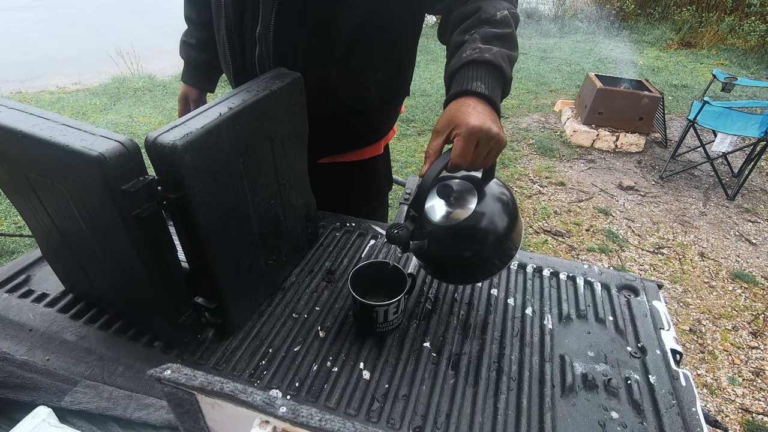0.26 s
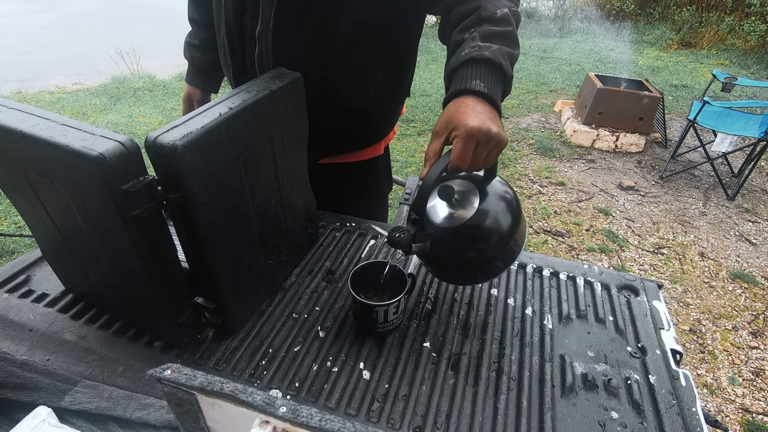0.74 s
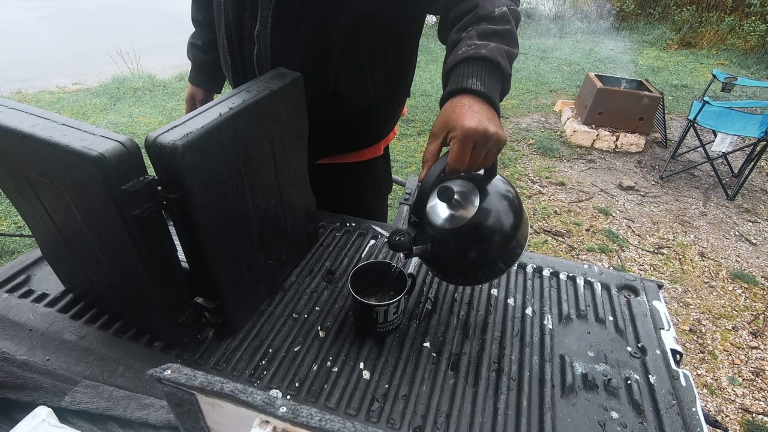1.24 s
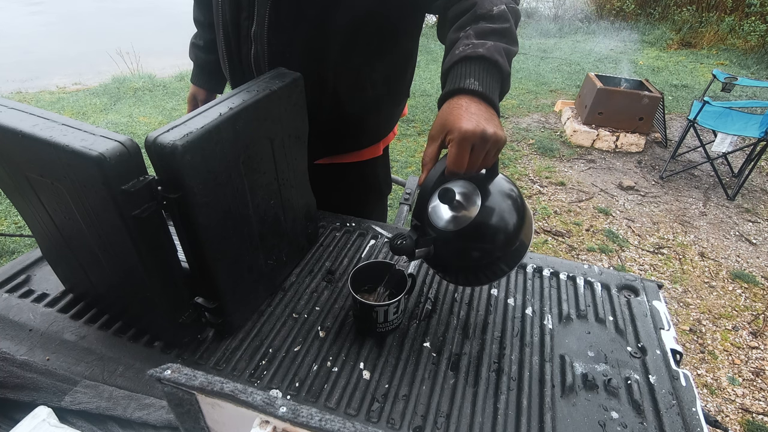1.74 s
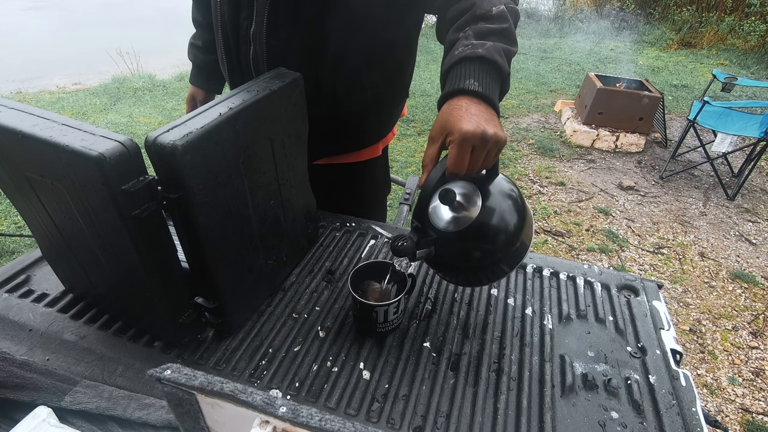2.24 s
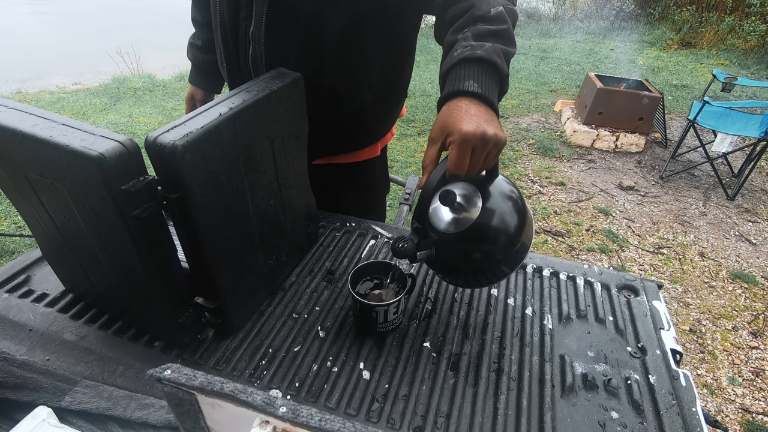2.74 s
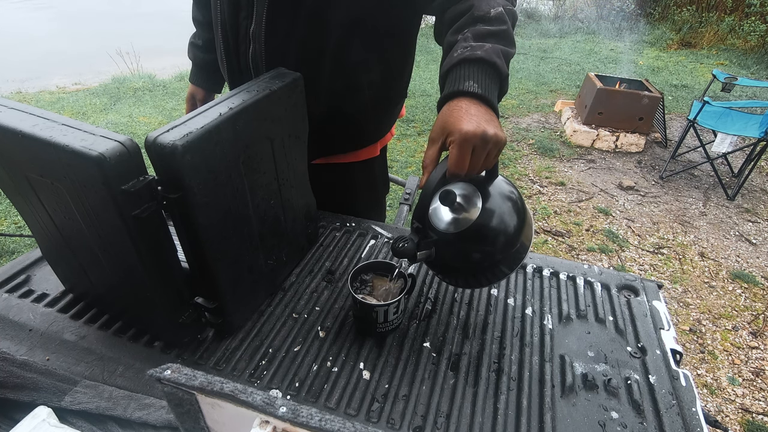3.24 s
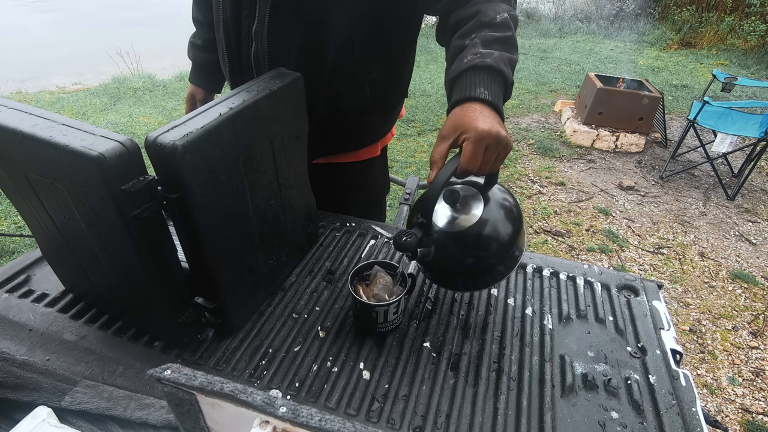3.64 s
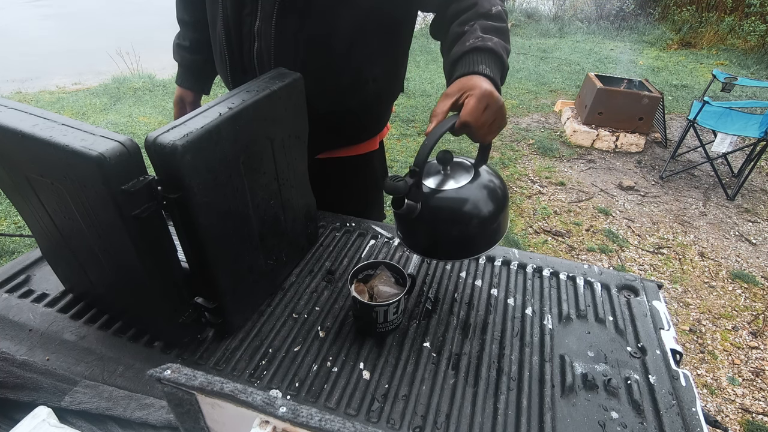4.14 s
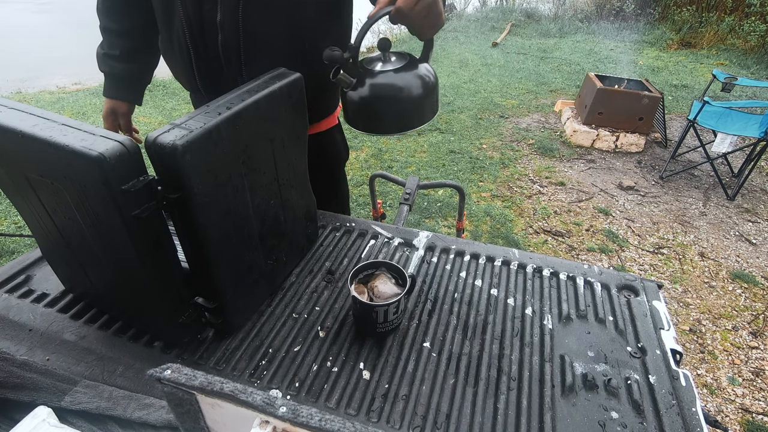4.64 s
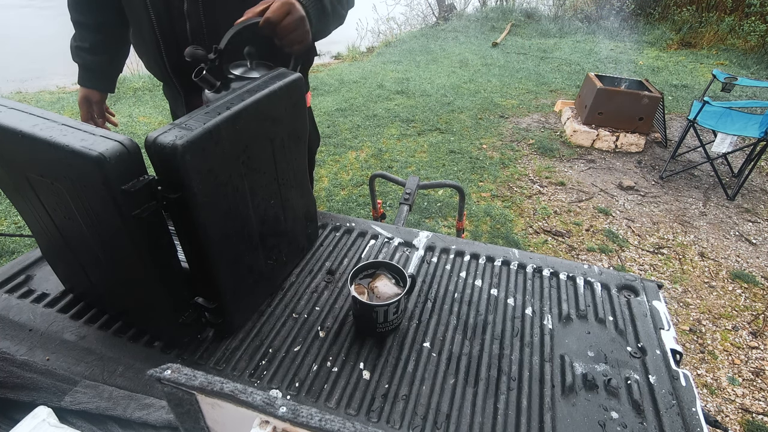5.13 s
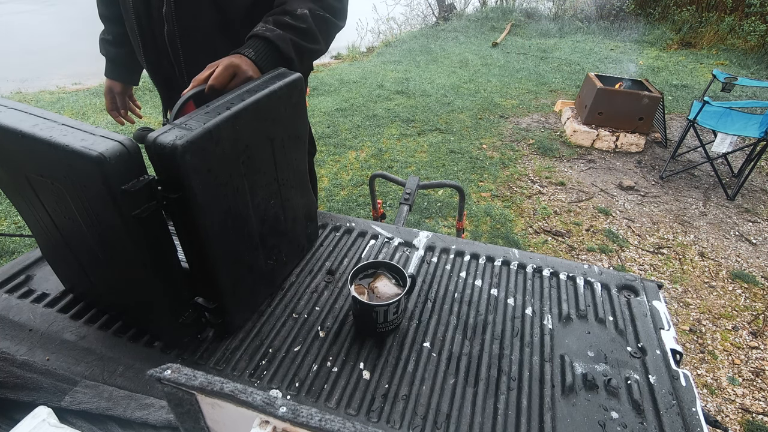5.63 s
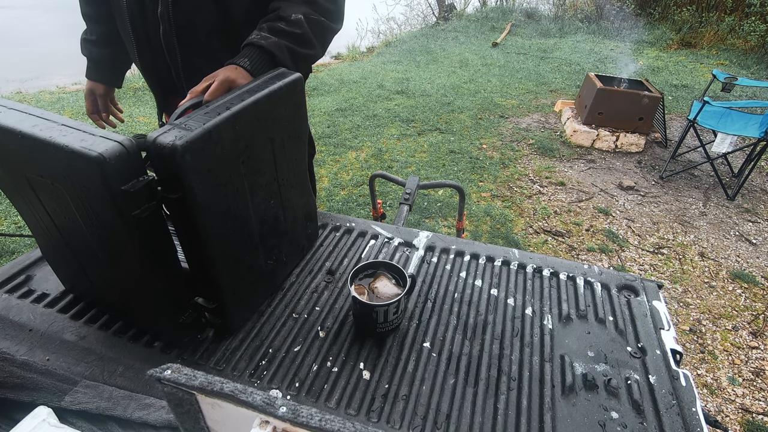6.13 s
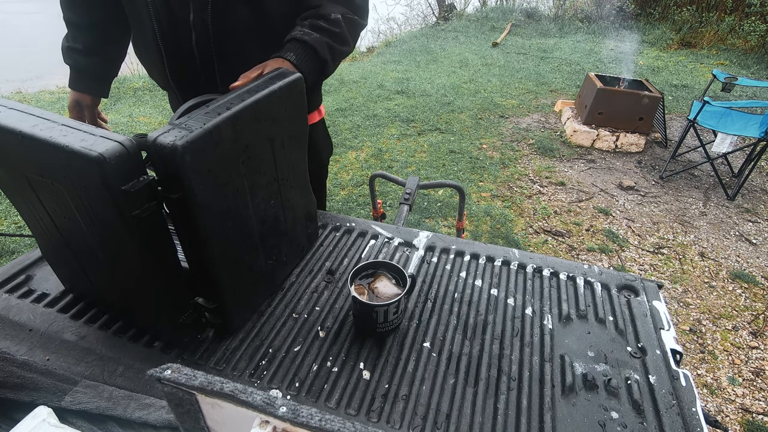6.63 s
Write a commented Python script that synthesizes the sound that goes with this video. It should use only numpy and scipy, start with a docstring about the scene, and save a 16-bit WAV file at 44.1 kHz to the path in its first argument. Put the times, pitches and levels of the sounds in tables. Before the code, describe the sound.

An uneven trickle ticks and bubbles into a metal cup for almost four seconds, its middle darker and gluggy with soft mug thumps. A small metallic bump follows as pouring stops, and a high bird trills through tree echoes. After a near-quiet gap with grassy scuffing, several dull, hollow panel thuds and clanks come close together. Open air, near microphone, faint distant hum.

```python
"""Pouring water into a metal mug outdoors

Water is poured in an uneven trickle from a kettle into a metal mug on a truck's ribbed tailgate: rising bubble
blips tick and plop, some with a thump of mug resonances. The tailgate is bumped, the kettle and a case lid knock
on it: noise-driven decaying modes plus rattle. A sleeve and steps in the grass rustle as grainy band noise.
Songbirds whistle and trill as glides smeared by tree echoes, over a low distant hum of flickering noise bands."""
import sys
import numpy as np
from scipy import signal
from scipy.fft import rfft, irfft
from scipy.io import wavfile
from scipy.ndimage import uniform_filter1d

SR = 44100
rng = np.random.default_rng(int(sys.argv[2]) if len(sys.argv) > 2 else 0)


def to_wav(s):
    """Save 16-bit WAV."""
    ch = np.atleast_2d(s).T  # columns
    pcm = np.round(np.clip(ch, -1, 1) * 32767)  # PCM
    wavfile.write(sys.argv[1], SR, pcm.astype(np.int16))


N = 303408
t = np.arange(N) / SR
hz_axis = np.maximum(np.fft.rfftfreq(N, 1 / SR), 1)


def undb(db):
    """Amplitude gain of a dB level."""
    return 10 ** (np.asarray(db) / 20)


def unit(x):
    """Scale to RMS 1."""
    return x / np.sqrt(np.mean(x ** 2))


def along(table):
    """Read a (Hz, value) table at every frequency, linear in log Hz."""
    hz, value = np.transpose(table)
    return np.interp(np.log(hz_axis), np.log(np.maximum(hz, 1)), value)


def curve(s, db):
    """Gain along a dB curve, -200 dB outside it."""
    return undb(np.interp(t, s, db, -200, -200))


def band(x, hz, width_hz):
    """Two-pole resonance, gain 1 at the centre."""
    return signal.lfilter(*signal.iirpeak(min(hz, .45 * SR), hz / width_hz, SR), x)


def add(out, s, x):
    """Mix x into out from time s."""
    i = int(s * SR)
    out[i:i + len(x)] += x[:len(out) - i]


def fade(t60_s):
    """Exponential decay envelope."""
    return np.exp(-np.log(1000) * t[:int(t60_s * SR)] / t60_s)


def walk(rate_hz):
    """Random steps at rate_hz, smoothed twice by a one-step moving average."""
    k = int(SR / rate_hz)
    steps = np.repeat(rng.standard_normal(N // k + 1), k)
    return 0.93 * uniform_filter1d(uniform_filter1d(steps, k), k)[:N]


# Hum and air spectrum: (frequency [Hz], relative level [dB per Hz])
FIELD_HZ_DB = [(25, -6.5), (91, -18), (167, 0), (510, -16), (579, -5), (785, -2), (1950, -18), (2930, -20),
               (4290, -18.5), (10700, -34), (13900, -100)]
# Left-right likeness: (frequency [Hz], correlation [-1..1])
FIELD_ALIKE = [(300, .97), (600, -.7), (1300, -.6), (3000, .5), (9000, 0.)]
FIELD_MID_DB = -68.5


def field():
    """Far hum and air: half-octave-spaced noise bands, each flickering alone."""
    mid, side = 0, 0
    alike = np.clip(along(FIELD_ALIKE), -1, 1)
    for hz in 30 * 2 ** np.arange(0, 9, .5):
        shape = np.exp(-(np.log2(hz_axis / hz) / 0.5) ** 2) * undb(along(FIELD_HZ_DB))
        band_mid = irfft(rfft(rng.standard_normal(N)) * shape * np.sqrt(1 + alike), N)
        band_side = irfft(rfft(rng.standard_normal(N)) * shape * np.sqrt(1 - alike), N)
        gain = undb(1.2 * walk(3.41))
        mid, side = mid + gain * band_mid, side + gain * band_side
    scale = undb(FIELD_MID_DB) / np.sqrt(np.mean(mid ** 2))
    return mid * scale, side * scale


def note(shape, hz):
    """A near-sine glide that turns near a given pitch and warbles slightly."""
    length_s, turn, start, end = shape
    u = np.linspace(0, 1, int(length_s * SR))
    glide = np.interp(u, [0, turn, 1], [start, 1, end])
    hz = hz * uniform_filter1d(glide, size=len(u) // 5, mode="nearest")
    hz *= 1 + .016 * np.repeat(rng.standard_normal(len(u) // 150 + 1), 150)[:len(u)]
    return np.sin(2 * np.pi * np.cumsum(hz) / SR) * np.sqrt(np.abs(np.sin(np.pi * u)))


# Whistled notes: (time [s], shape name, turning pitch [Hz], level before echoes [dB])
WHISTLE = [(0.049, "fall", 2810, -78.5), (0.135, "hold", 3430, -73), (.312, "slide", 2314, -74),
           (.42, "fall", 2163, -76.5), (3.05, "arch", 6420, -66.5), (3.148, "dip", 7400, -67),
           (3.324, "slide", 3960, -77), (3.385, "arch", 6350, -66.5), (3.422, "fall", 2660, -78),
           (3.474, "dip", 7220, -67.5), (3.496, "hold", 3038, -76), (3.597, "dip", 8370, -73),
           (3.683, "arch", 6430, -61.5), (5.505, "fall", 2823, -78), (5.789, "slide", 2730, -79.5),
           (6.432, "arch", 4860, -69.5), (6.519, "drop", 3130, -77.5), (6.559, "fall", 2430, -76.5),
           (6.612, "arch", 3240, -73)]
# Note shapes by name: (length [s], share before the turn, start / turning pitch, end / turning pitch)
NOTE_SHAPE = dict(arch=(.045, .45, .68, .88), dip=(0.0494, 0.36, 1.3, 1.07), slide=(0.04, 0.6, 1.08, 0.8),
              fall=(.075, 0.32, 1.6, .97), drop=(0.021, 0.51, 1.8, 0.45), hold=(.165, .33, .81, .995))
# Falling sweep of the trill: (length [s], share before the turn, start / turning pitch, end / turning pitch)
TRILL_SWEEP = (.038, .45, 1.33, .555)
TRILL_S, TRILL_PERIOD_S, TRILL_HZ, TRILL_DB = 3.777, .0838, 7030, -63.5


def birds():
    """Distant song, smeared by echoes off the trees, unlike at the two ports; high voices sit nearer."""
    far, near = np.zeros(N), np.zeros(N)
    for s, shape, hz, db in WHISTLE:
        add(near if hz > 4500 else far, s, undb(db) * note(NOTE_SHAPE[shape], hz))
    for k in range(15):
        add(near, TRILL_S + k * TRILL_PERIOD_S, undb(TRILL_DB) * note(TRILL_SWEEP, TRILL_HZ))
    out = np.zeros((2, N))
    for song, dry_gain, wet_gain, t60_s in ((far, .35, 1.1, .5), (near, .15, .3, .45)):
        env = fade(t60_s)
        flutter = np.exp(-t[:len(env)] / 0.011)
        trees = rng.standard_normal((3, len(env))) * (wet_gain * env + flutter) * undb(-24.0)
        trees = trees[:1] + trees[1:]  # one shared part, one per port
        leaves = undb(4 * walk(400))  # moving foliage blurs the echoes
        out += leaves * dry_gain * song
        out += leaves * signal.fftconvolve(song[None], trees, axes=1)[:, :N]
    return out


def bubble(hz, cycles, click):
    """A short rising blip with its octave, and a broad tick and spray around it."""
    s = t[:1200]
    phase = 2 * np.pi * hz * s * (1 + 0.09 * hz * s / cycles)
    tone = np.sin(phase) + hz / 20000 * np.sin(2 * phase)
    tone = tone * np.exp(-np.log(1000) * s * hz / cycles) * (1 - np.exp(-hz * s))
    spray = np.exp(-s / 0.0012) + 0.3 * np.exp(-s / 0.011)
    return 2 * tone + click * band(rng.standard_normal(1200), 1.84 * hz, 11000) * spray


# Sleeve and steps in the grass: (time [s], level [dB])
RUSTLE_S_DB = [(4.85, -76), (5.0, -67), (5.15, -62), (5.25, -70.5), (5.5, -91)]
# Dull ticks: (time [s], level [dB])
SCUFF_S_DB = [(4.9432, -48), (5.183, -48.5)]


def rustle():
    """Soft scuffing: band noise with a grainy random level, and a few dull ticks."""
    cloth = rng.standard_normal(N)
    grain = undb(7.7 * walk(40))
    out = curve(*np.transpose(RUSTLE_S_DB)) * grain * unit(band(cloth, 1020, 2200) + band(cloth, 2230, 410))
    for s, db in SCUFF_S_DB:
        add(out, s, undb(db) * bubble(1370, 9.7, 0.15))
    return out


def ring(modes, rise_s, contact_s, loose):
    """A blow on modes: rough contact drives them unevenly, heavy parts swell in, loose parts wander in pitch."""
    s = t[:SR // 2]
    chance = rng.standard_normal((len(modes), 16))
    out = 0
    for (hz, db, t60_s), c in zip(modes, chance):
        wander_s = np.cumsum(1 + loose * np.interp(s, np.linspace(0, .5, 15), c[1:])) / SR
        decay = np.exp(-np.log(1000) * s / t60_s)
        out = out + undb(db + c[0]) * np.sin(2 * np.pi * hz * wander_s) * decay
    contact = rng.standard_normal(SR // 8) * np.exp(-t[:SR // 8] / max(contact_s, 1e-4))
    out = signal.fftconvolve(out * (1 - np.exp(-s / max(rise_s, 1e-4))), contact)
    return out / np.max(np.abs(out))


# Knocks: (time [s], panel level [dB]; then, relative to the panel: sway [dB], ribs [dB],
# hardness as crack [dB], steel [dB]; grinding contact [s])
KNOCK = [(3.602, -52, 0.5, -31, -44, -21, 0.017), (3.971, -34.5, -15, 2, -10.5, -2, 0.023),
         (5.917, -46, -37, 6, 3, -3.5, 0.16), (5.974, -37.5, -35, 6.5, -6.5, -16, 0.011),
         (6.035, -30, -10, -5, -10, -17.5, 0.0057), (6.051, -34.5, -8, 5.5, -0.5, 3.5, 0.019),
         (6.255, -21.5, -12.5, -9, -14, -19.5, 0.032), (6.565, -40, -8.5, -2, -21, -50, 0.052),
         (6.648, -25, -4.5, 0, -10, -28, 0.028), (6.743, -34, -1, -1, -24.5, -31, 0.025)]
# Tailgate modes, heavy to light, then thin steel: (frequency [Hz], level [dB], t60 [s])
SWAY_MODES = [(77.9, -3.5, 0.37), (108.7, -1, 0.38)]
PANEL_MODES = [(177.7, 0, 0.3)]
RIB_MODES = [(261.4, 0, 0.24), (358.5, -12, 0.21)]
SHELL_MODES = [(415, 1, 0.068), (510, -3.5, 0.064), (650, -2.5, 0.027), (825, -1, 0.033), (953, -8, 0.058),
               (1165, -11, 0.045), (1416, -9.5, 0.047), (1839, -15.5, 0.063)]
STEEL_MODES = [(729, 10.5, 0.23), (1660, -5.5, 0.37), (1830, -15.5, 0.5), (2816, 5, 0.1), (3890, 2, 0.099),
               (4224, -4, 0.14)]
# Crack spectrum: (frequency [Hz], relative level [dB per Hz])
CRACK_HZ_DB = [(150, -5), (700, 6.5), (1200, -0.5), (2100, -7), (4600, -17), (9000, -43)]
SHELL_DB = 9.5  # over the crack: a harder blow rings the light shell more


def knocks():
    """Each knock rings the tailgate's parts and rattles noisily while it grinds; the heavy parts lag."""
    out, rattle, sizzle = np.zeros((3, N))
    s_half = t[:SR // 2]
    for s, db, sway_db, rib_db, hard_db, steel_db, grind_s in KNOCK:
        sway = undb(db + sway_db) * ring(SWAY_MODES, 0.025, .02, .12)
        panel = undb(db) * ring(PANEL_MODES, 0.0042, 0, .06)
        add(out, s, sway + panel)
        add(out, s, undb(db + rib_db) * ring(RIB_MODES, 0.0063, 0, .04))
        add(out, s, undb(db + hard_db + SHELL_DB) * ring(SHELL_MODES, 0.00051, grind_s, 0.039))
        add(out, s, undb(db + steel_db) * ring(STEEL_MODES, 0, grind_s / 20, .004))
        add(rattle, s, undb(db + hard_db) * np.exp(-s_half / (0.0036 + grind_s)))
        add(sizzle, s, undb(db + steel_db) * s_half / grind_s * np.exp(-s_half / (0.39 * grind_s)))
    grit = unit(irfft(rfft(rng.standard_normal(N)) * undb(along(CRACK_HZ_DB)), N))
    hiss = undb(3.5) * unit(band(rng.standard_normal(N), 6900, 3800))  # loose steel chatters just after
    return out + (rattle * grit + sizzle * hiss) * undb(0.49 * walk(90))


def glug():
    """A low tone under a plop with a falling, unsteady pitch, each one its own size."""
    env, size = fade(0.13), 2 ** (0.64 * (rng.random() - .5))
    fall_hz = 230 + 1100 * np.exp(-t[:len(env)] / 0.00713)
    hz = size * fall_hz * (1 + 3.0 * band(rng.standard_normal(len(env)), 144, 380))
    return np.sin(2 * np.pi * np.cumsum(hz) / SR) * env


def splash(db, hz):
    """One main bubble, 10 ms in, and four weaker ones around it."""
    out = np.zeros(SR // 12)
    add(out, 1 / 100, undb(db) * bubble(hz, 24, 0.45))
    for u, v, e in rng.random((4, 3)):
        small = bubble(hz * 2 ** (0.3 * v - .12), 24, 0.35)
        add(out, .006 + .03 * u, undb(db - 9 - 8 * e) * small)
    return out


# Starting pitch of splashes and drops: (time [s], pitch [Hz])
RING_S_HZ = [(.375, 3300), (.4, 1896), (.66, 1800), (.76, 4080), (1.235, 4500), (1.28, 2890), (1.69, 4090),
             (1.96, 2750), (2.8, 3570), (3.7, 3840)]


def ring_hz(s):
    """Splash and drop pitch at time s."""
    return np.interp(s, *np.transpose(RING_S_HZ))


# Splashes: (time [s], level [dB])
SPLASH_S_DB = [(0.298, -49), (0.373, -45.5), (0.4018, -50.5), (0.6562, -44), (0.767, -46), (.7884, -48),
               (.93, -46), (0.946, -43.5), (0.967, -35), (1.0167, -40.5), (1.1102, -57), (1.2344, -42.5),
               (1.2801, -45), (1.3529, -39), (1.3746, -47), (1.4253, -42), (1.639, -54), (1.6873, -39),
               (1.968, -38), (2.845, -50), (2.964, -47), (3.003, -47), (3.065, -55), (3.092, -49),
               (3.107, -45.5), (3.1543, -46.5), (3.241, -45), (3.251, -42), (3.266, -50), (3.3203, -38),
               (3.3305, -40.5), (3.5105, -40), (3.712, -46)]
# Low plops, some with a mug thump: (time [s], plop level [dB], thump level [dB])
PLOP_S_DB = [(1.189, -53, -55.5), (1.56, -52, -55), (1.688, -49.5, -55), (1.87, -46, -42.5),
             (1.9653, -44, -46), (2.079, -42.5, -45.5), (2.153, -54, -52.5), (2.2463, -39.5, -43),
             (2.256, -48, -51), (2.34, -44.5, -54), (2.351, -44, -58), (2.5115, -47, -51.5),
             (2.615, -51.5, -50), (2.768, -48, -71), (2.926, -55, -72), (2.951, -49.5, -61.5)]
# Trickle between splashes: (time [s], level [dB])
TRICKLE_S_DB = [(0.6, -93), (0.879, -72.5), (1.08, -69), (1.3, -64.5), (1.58, -77.5), (1.68, -63.5),
                (1.76, -81.5), (2.0, -69.5), (2.47, -72), (2.7, -78.5), (3.051, -73.5), (3.3, -71),
                (3.451, -74)]
# Mug modes: (frequency [Hz], level [dB], t60 [s])
MUG_MODES = [(187, -2, 0.23), (268, -7.5, 0.33), (369, -7.5, 0.076), (475, 0.5, 0.11), (790, -6.5, 0.063),
             (1343, -3.5, 0.032)]
PLOP_HZ, PLOP_RISE_HZ_PER_S = 1085, 137  # pitch at time 0; climbs as the mug fills
GLUG_DB = -5  # relative to the thump
CHURN_DB = -69.5


def pouring():
    """Splashes are bubble clusters; drops and fizz surge with the flow; low plops, some with a mug thump."""
    out, lead_s = np.zeros(N), 1 / 100
    for s, db in SPLASH_S_DB:
        add(out, s - lead_s, splash(db, ring_hz(s)))
    for s, plop_db, thump_db in PLOP_S_DB:
        add(out, s - lead_s, splash(plop_db, PLOP_HZ + PLOP_RISE_HZ_PER_S * s))
        add(out, s, undb(thump_db) * ring(MUG_MODES, 0.0014, 0.014, 0.12))
        add(out, s, undb(thump_db + GLUG_DB) * glug())
    s, flow_db = np.transpose(TRICKLE_S_DB)
    drops = np.zeros(N)
    for u, v, e in rng.random((2400, 3)):
        at_s = s[0] + u * (s[-1] - s[0])
        hz = ring_hz(at_s) * 2 ** (1.8 * (v - .4) / at_s)  # the fuller the mug, the more alike
        add(drops, at_s, undb(14 * e ** 3) * bubble(hz, 18, 0.4))
    fizz = unit(drops) * undb(5.1 * walk(29.42))
    fizz += 0.5 * unit(band(rng.standard_normal(N), 5300, 6000))  # wet hiss between drops
    noise = rng.standard_normal(N) * undb(5 * walk(20))
    churn = unit(sum(undb(db) * band(noise, hz, 7 / t60_s) for hz, db, t60_s in MUG_MODES))
    fill = np.exp(-((t - 2.1) / 1.46) ** 2)  # the half-full mug churns loudest
    out += curve(s, flow_db) * fizz + undb(CHURN_DB) * fill * churn
    return signal.sosfilt(signal.butter(2, 140, "high", fs=SR, output="sos"), out)


# Left port's phase lead: (frequency [Hz], lead over right [rad])
PORT_HZ_RAD = [(4500, .2), (7500, 2.3)]
# Port level difference: (frequency [Hz], left minus right [dB])
PORT_HZ_DB = [(300, 0), (900, 4), (4000, 1), (10000, -2)]


def scene():
    """Near sounds reach two ports with a pitch-dependent offset and unlike short reflections."""
    mid, side = field()
    near = pouring() + knocks() + rustle()
    port = undb(along(PORT_HZ_DB) / 2) * np.exp(.5j * along(PORT_HZ_RAD))
    bounce = rng.standard_normal(1500) * np.exp(-t[:1500] / .008)
    bounce = band(band(bounce, 1300, 1500), 1300, 1500)
    echo = signal.fftconvolve(near, bounce / np.sqrt(np.sum(bounce ** 2)))[:N] * undb(-15.0)
    direct = np.array([irfft(rfft(near) * port, N), irfft(rfft(near) / port, N)])
    return direct + np.array([mid + side + echo, mid - side - echo]) + birds()


def record(dry):
    """Darken the top: at least 18 dB down above 10.7 kHz, then cut steeply from 14 kHz."""
    shelf = signal.sosfilt(signal.ellip(6, .2, 18, 10700, fs=SR, output="sos"), dry)
    return signal.sosfilt(signal.butter(6, 14000, fs=SR, output="sos"), shelf)


dry = scene()
out = record(dry)
to_wav(out)
```